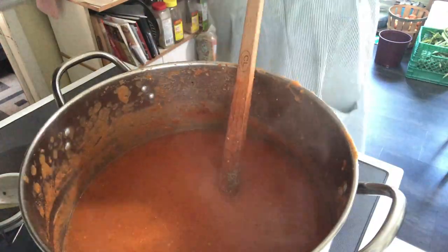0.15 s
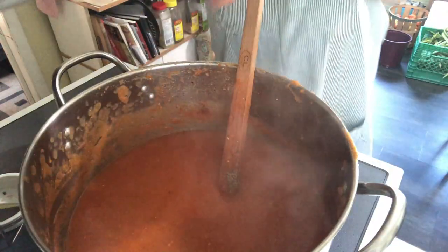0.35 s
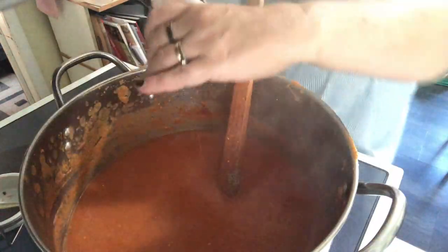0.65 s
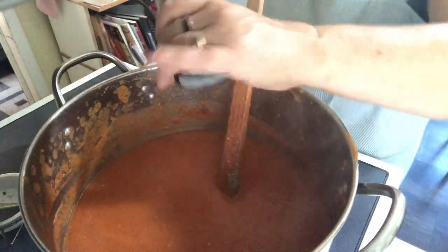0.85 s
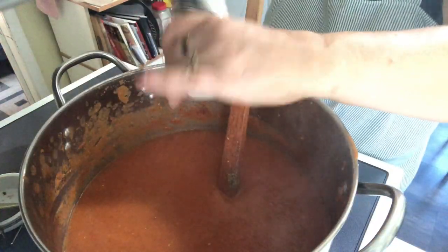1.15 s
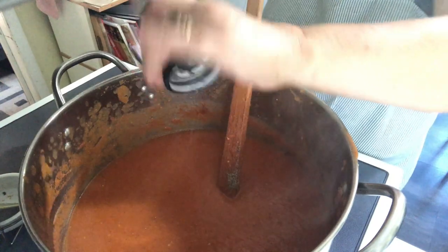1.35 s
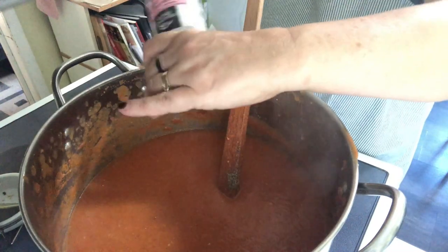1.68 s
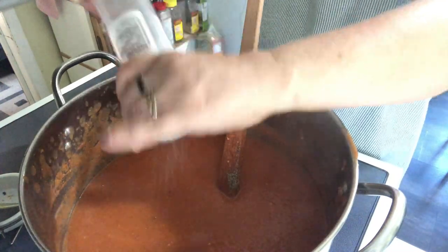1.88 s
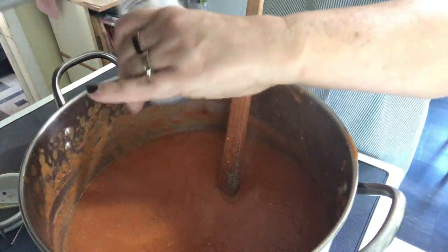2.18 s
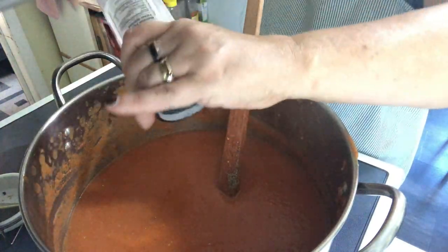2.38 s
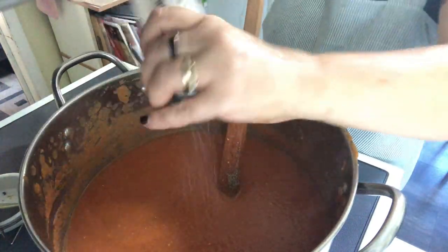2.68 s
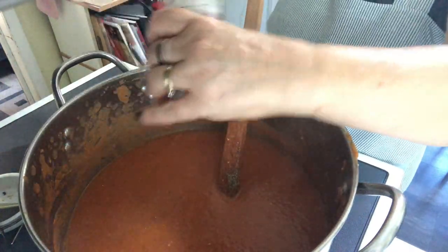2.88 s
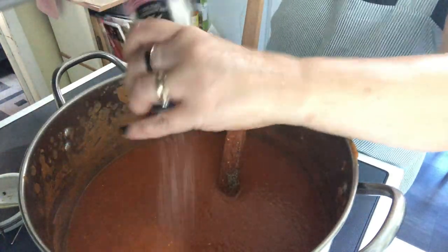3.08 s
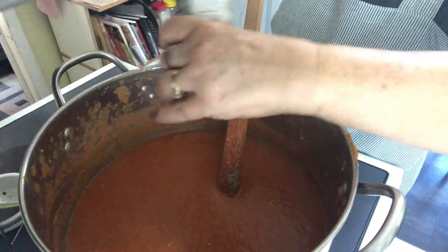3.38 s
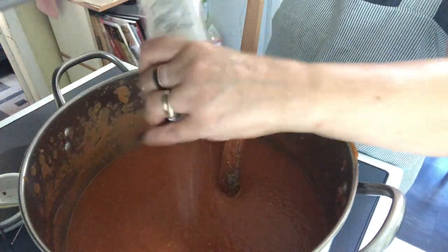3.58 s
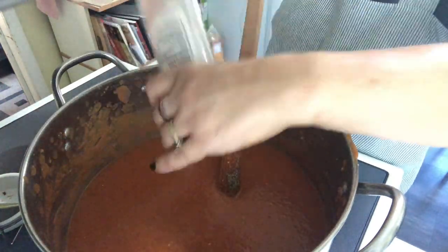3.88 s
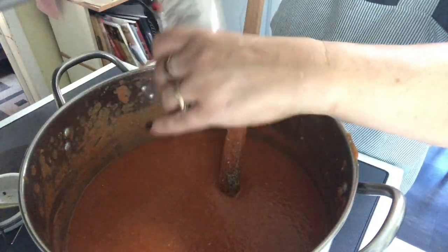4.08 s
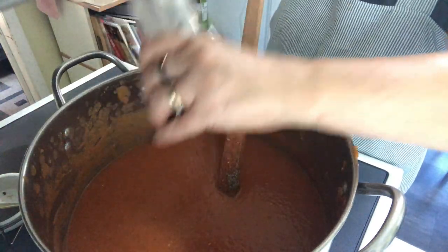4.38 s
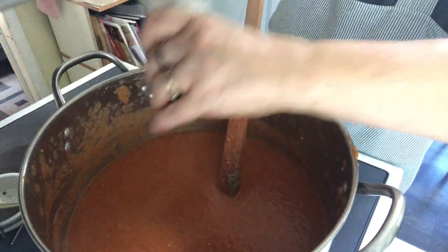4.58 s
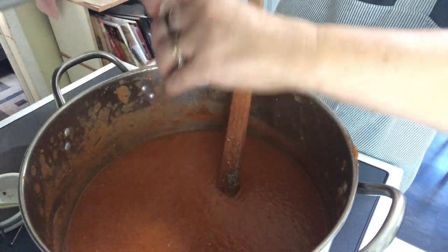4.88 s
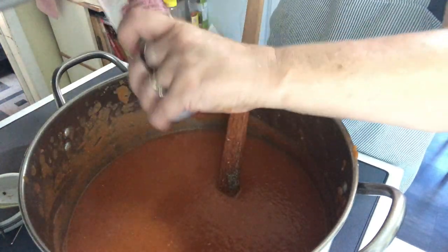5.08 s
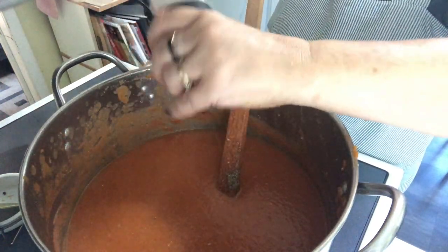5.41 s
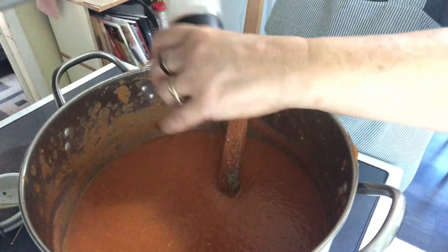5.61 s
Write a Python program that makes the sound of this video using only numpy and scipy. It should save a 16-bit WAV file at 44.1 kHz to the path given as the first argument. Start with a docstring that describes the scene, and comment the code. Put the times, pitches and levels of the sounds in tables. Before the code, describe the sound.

A close, fairly dry kitchen sound with short reflections. A very faint low rush and barely audible thick blubs run throughout. At about 0.15 s salt begins to slide in a plastic jar, a thin bright sizzle with small ticks; around 0.55 s there is a soft handling bump and the first hard jerk. Sharp, hollow plastic clacks with gritty spray come at about 0.6, 0.9, 1.25, 1.4, 1.65 and 1.85 s, each followed by a brief sandy slide. From 2 to 2.5 s it is nearly quiet, with a little trickle and a tiny plop at 2.5. Longer, crunchier shakes land near 2.6, 3.0 and 3.5 s with quiet gaps between. Around 3.9 s a strong bright swish of grains pours, then fine ticks. Knocks return at 4.35 and 4.65 s, lighter rattles from 5.0, and a tight cluster of clacks ends it near 5.5 s.

```python
"""Salt shaker over a simmering pot

A plastic shaker of salt is jerked up and down over a pot of sauce, close by in a kitchen.
Fine salt hisses along the jar (dense random grains through the jar's resonances); at each jerk
caked lumps knock on its ends and make it ring (short clusters of contacts through resonances).
A soft handling bump (swelling noise), a plop (two fading tones) and faint blubs (ringing clicks)
join in, over the low rush of the kitchen (coloured noise)."""
import sys
import numpy as np
from scipy import signal
from scipy.fft import rfft, irfft, next_fast_len
from scipy.io import wavfile
from scipy.ndimage import uniform_filter1d

SR = 44100
rng = np.random.default_rng(int(sys.argv[2]) if len(sys.argv) > 2 else 0)


def wav_out(sig):
    """Save sig, one row per channel (or a flat mono array), as 16-bit PCM at SR to the path in sys.argv[1]."""
    wavfile.write(sys.argv[1], SR, np.round(np.clip(np.atleast_2d(sig).T, -1, 1) * 32767).astype(np.int16))


N = 253512
TIME = np.arange(N) / SR  # seconds

# Levels in the tables are mixing levels: the sound functions add their own fixed trims.
# kitchen background colour: pitch_hz, level_db
KITCHEN_COLOUR = [(22, -44), (52, 4.5), (70, 2.5), (95, 0.5), (220, 3.5), (450, 0), (680, -8.5),
                  (1000, -4.5), (2200, -9), (2700, -13), (4500, -9.5), (8000, -22), (16000, -30)]
# the two rings of the sauce bubble: start_s, pitch_hz, decay_s, level_db
PLOP_RINGS = [(2.5016, 1800, 0.0022, -15.5), (2.5036, 1124, 0.0061, -15.5)]
# bump, rub of the palm, rumble: start_s, pitch_hz, width_hz, swell_s, level_db
HANDLING = [(.552, 310, 390, 0.011, -31), (.585, 200, 380, 0.029, -40), (.556, 50.0, 82, 0.036, -39.0)]
# colour of the reflections: pitch_hz, level_db
ROOM_COLOUR = [(70, -5.0), (190, 16), (400, 9), (900, 11.5), (5000, 5.5), (16000, 4)]
# resonances of the jar: pitch_hz, width_hz, level_db (against the direct sound)
JAR_MODES = [(1162, 64, -1.5), (2076, 170, -3), (2364, 153, 9), (3060, 410, -3.5), (3780, 120, -2),
             (4340, 54, -0.5), (5930, 91, -0.5), (7180, 470, -0.5), (7700, 124, 3.5), (10700, 930, -16)]
# colour of fine grains: pitch_hz, level_db
FINE_COLOUR = [(300, -53), (1200, -12), (2600, -4.5), (4000, 1.5), (7300, 0), (8600, -3), (10200, 0),
               (12500, -2), (16000, -9.5)]
# colour of coarse grains: pitch_hz, level_db
COARSE_COLOUR = [(100, -21), (600, -9.5), (950, -3), (1400, 5.5), (2200, 4), (2750, -0.5), (3400, 5),
                 (5500, -1.5), (8500, -11), (16000, -34)]
# colour of lumps: pitch_hz, level_db
LUMP_COLOUR = [(50, -60), (170, -58), (330, -24), (600, -1), (900, 8.5), (1700, -3.5), (3500, -8.5),
               (5000, -2.5), (7000, -7.5), (8600, -22), (16000, -1)]
# short hollow rings of the air in the tipped jar: peak_s, level_db
HOOTS = [(.47, -31), (.606, -22.5), (.868, -24), (1.425, -23), (1.665, -28.5)]
# the jar is tilted and salt pours along the wall:
# start_s, swell_s, hold_s, hiss_db (fine grains), rub_db (coarse grains)
POURS = [(0.1485, 0.0011, 0.093, -31.5, -31.5), (0.246, 0.047, 0.41, -31.5, -33.5),
         (0.809, .015, 0.092, -34, -30), (1.141, .005, 0.084, -40.5, -26),
         (1.259, 0.014, 0.037, -26.5, -43), (2.05, 0.035, 0.14, -50.5, -47), (2.553, .025, .005, -30, -27),
         (2.958, 0.011, .005, -43, -31), (3.035, 0.019, 0.067, -32.5, -31), (3.528, .01, 0.064, -37.5, -35),
         (3.85, .065, 0.0043, -21.5, -23), (3.94, 0.031, 0.014, -12.5, -23), (4.023, .01, .025, -29.5, -45),
         (4.101, 0.039, 0.092, -32, -35), (4.24, 0.086, 0.018, -29.5, -28.5), (4.403, .02, .2, -55, -44),
         (5.018, 0.061, 0.11, -37.5, -32.5), (5.158, 0.02, 0.014, -29.5, -32),
         (5.266, .01, .16, -40.5, -33.5), (5.49, 0.0057, 0.078, -42, -26.5)]
# jerks of the wrist; the heap lands on one end of the jar, then slides back:
# start_s, landing_s, level_db, pitch_hz (struck spot), slide_lag_s, slide_half_width_s, slide_db
SHAKES = [(0.593, 0.0049, -12.5, 1240, 0.16, 0.026, -25), (0.9611, .011, -11.5, 2650, 0.11, 0.023, -24.5),
          (1.250, 0.0058, -10.5, 1600, 0.077, 0.011, -20.5), (1.378, 0.074, -16, 3000, 0.16, 0.045, -31.5),
          (1.6577, .007, -13, 1950, 0.088, 0.029, -29.5), (1.865, .017, -13, 1270, 0.1, 0.032, -26),
          (2.573, 0.062, -14.5, 2640, 0.13, 0.043, -35), (2.996, 0.033, -13, 3020, 0.15, 0.022, -38.5),
          (3.487, 0.0174, -12.5, 2900, .16, 0.031, -34.5), (4.358, 0.0091, -14.5, 2800, 0.012, 0.016, -26),
          (4.648, 0.009, -13.5, 3480, 0.12, .036, -31.5), (5.585, 0.0063, -14.5, 2170, 0.086, 0.029, -29)]
# the flow thins at the turn of a stroke: centre_s, dip_db (a negative dip thickens it)
LULLS = [(.72, 9.5), (1.135, 1), (1.362, 2), (1.612, -0.5), (1.785, 5), (2.392, 13), (2.945, 19),
         (3.418, 17), (3.79, 21), (3.835, 6), (4.985, -5), (5.465, 4)]
# single caked lumps: start_s, landing_s, level_db, pitch_hz (struck spot), grit_db
KNOCKS = [(0.163, 0.0041, -25, 3170, -27.5), (0.445, 0.0048, -23.5, 2350, -44),
          (0.493, 0.0024, -22.5, 5950, -26), (0.563, 0.015, -24.5, 2170, -33),
          (0.836, .0092, -21, 2200, -36), (0.866, 0.0055, -11.5, 1100, -24.5),
          (0.9019, .0055, -16.5, 2370, -25), (0.916, .0026, -20, 2210, -33),
          (0.99, 0.0026, -15.5, 2370, -29), (1.15, 0.0063, -26.5, 2280, -46),
          (1.214, 0.007, -22, 2230, -42), (1.234, 0.0056, -18, 2170, -39), (1.375, 0.0088, -11, 2530, -40),
          (1.399, 0.0079, -13, 3840, -20), (1.417, 0.022, -19, 1250, -41), (1.4606, 0.0058, -13, 1890, -30),
          (1.473, 0.005, -17, 1400, -27.5), (1.628, 0.0044, -14, 2780, -44),
          (1.805, 0.011, -21.5, 1280, -27), (1.829, 0.0057, -9.5, 3320, -39),
          (1.839, 0.018, -22, 2170, -28.5), (2.101, 0.0052, -47, 5600, -39),
          (2.156, 0.0046, -39, 3200, -46), (2.419, 0.0061, -43.5, 2390, -46),
          (2.738, 0.0048, -30, 1390, -48), (2.914, 0.0051, -48, 7040, -48), (2.971, 0.01, -21, 2360, -48),
          (3.036, 0.02, -17, 2330, -26), (3.0664, 0.0041, -9.5, 2370, -36),
          (3.305, 0.0058, -43, 2400, -47.5), (3.347, 0.0049, -44, 4000, -43.5),
          (3.447, 0.047, -27, 2900, -43), (3.475, 0.0036, -17, 7150, -21), (3.5151, .011, -13, 3700, -22.5),
          (3.635, 0.0031, -42, 3660, -26.5), (3.813, 0.0049, -38, 3700, -48),
          (3.924, 0.0034, -36, 6960, -16), (4.064, .0015, -37, 7890, -24.5), (4.126, .0033, -39, 7410, -26),
          (4.161, 0.0025, -39, 4140, -23), (4.187, 0.0022, -28, 3280, -24.5),
          (4.229, 0.0012, -25, 8000, -26), (4.378, 0.0057, -26.5, 1710, -24),
          (4.67, 0.0022, -17.5, 3050, -33), (4.871, 0.0021, -28.5, 1600, -59),
          (5.042, 0.0024, -26, 4910, -46), (5.059, 0.0079, -25.5, 1080, -39),
          (5.118, 0.0024, -23.5, 5200, -30), (5.151, .0022, -27.5, 3300, -25),
          (5.253, 0.0056, -19.5, 2820, -47), (5.268, 0.0072, -21, 2550, -41),
          (5.349, 0.0013, -22, 1360, -40), (5.476, 0.002, -32, 6060, -24.5),
          (5.482, 0.0036, -16.5, 3000, -17), (5.532, 0.0095, -21, 2760, -34),
          (5.565, 0.0032, -13.5, 2100, -27), (5.578, 0.0023, -15, 1470, -17.5)]

KITCHEN_DB = -50.5
HOOT_RISE_DB_PER_S, HOOT_FALL_DB_PER_S = 400, 400
SALT_START_S = POURS[0][0]  # no salt slides before the first pour
SETTLE_DB_PER_S = 270  # a pour dies away
TRICKLE_HISS_DB, TRICKLE_RUB_DB = -59, -49  # the salt never lies quite still
LEAD_S, LEAD_DB = 0.028, -20  # loose grains arrive ahead of the heap; level against its landing
TRAIL_HISS_DB, TRAIL_RUB_DB = -21.5, -10  # stragglers follow it; levels against its landing
DRAIN_DB_PER_S = 135  # the stragglers die away
SLIDE_RUB_DB = -7  # coarse rub against the hiss of the slide back
LULL_S, LULL_THIN_S = 0.0084, 0.026  # half width in a full flow; in a trickle
GRIT_DB = -14  # grit against the landing of a heap
CRUMBS_PER_S, CRUMB_S, CRUMB_HZ = 13, 0.0019, 3630  # rough rate; landing time; middle pitch
CRUMB_GRIT_DB = 6.5  # the most grit a crumb sheds, against its own level
CRUMB_DB, CRUMB_SCATTER_DB = -30, 1  # level in a flow of -30 dB; random spread either way
CRUMB_FOLLOW = 1  # dB gained per dB of flow
TOP_HZ = 15800


def undb(db):
    """Decibels to gain."""
    return 10 ** (np.asarray(db) / 20)


def unit(x):
    """Scale to rms 1."""
    return x / np.sqrt(np.mean(x ** 2))


def add(out, s, sound):
    """Mix a sound in at time s."""
    start = int(s * SR)
    out[start:start + len(sound)] += sound[:N - start]


def ring(x, response):
    """Pass a sound through an impulse response."""
    return signal.fftconvolve(x, response)[:len(x)]


def band(x, hz, width_hz):
    """One resonance, gain 1 at its centre."""
    hz = min(hz, SR / 2.2)
    return signal.lfilter(*signal.iirpeak(hz, hz / min(width_hz, SR / 4), fs=SR), x)


def steep_band(x, hz, width_hz):
    """The same resonance twice in a row, for steeper sides."""
    return band(band(x, hz, width_hz), hz, width_hz)


def resonant_noise(hz, width_hz):
    """Noise in one steep-sided resonance, rms 1."""
    return unit(steep_band(rng.standard_normal(N), hz, width_hz))


def colour(points, size=4096):
    """Impulse response with the given (Hz, dB) spectrum that starts at once, with nothing before time 0."""
    hz, db = np.transpose(points)
    grid = np.maximum(np.arange(size // 2 + 1) * SR / size, 1)
    level_db = np.interp(np.log(grid), np.log(hz), db)
    # folding the cepstrum gives the minimum-phase response
    cepstrum = irfft(np.log(undb(level_db)))
    return irfft(np.exp(rfft(2 * cepstrum[:size // 2], size) - cepstrum[0]))


def walk(rate):
    """Smooth random wander with spread 1, taking about `rate` new values a second."""
    hold = int(SR / rate)
    steps = np.repeat(rng.standard_normal(N // hold + 1), hold)
    return unit(uniform_filter1d(steps, hold)[:N])


def grains(count, per_s, spread_db):
    """Contacts of random size at random moments, rms 1."""
    size = undb(spread_db * np.minimum(rng.exponential(size=count), 6))
    happens = rng.random(count) < per_s / SR
    return unit(size * rng.standard_normal(count) * happens + 1e-9)


def in_jar(points, modes_db=0):
    """Response of the jar to one contact of the given colour: the tick plus its ringing, with energy 1."""
    tick = colour(points)
    ringing = sum(undb(db + modes_db) * band(tick, hz, width) for hz, width, db in JAR_MODES)
    response = tick + ringing
    return response / np.linalg.norm(response)


def kitchen():
    """Low rush of the stove and the room: coloured noise that wavers very slightly."""
    rush = unit(ring(rng.standard_normal(N), colour(KITCHEN_COLOUR)))
    return undb(KITCHEN_DB + 0.2 * walk(6.4)) * rush


def simmer(db=-57):
    """Thick sauce blubs faintly: bubbles of a few sizes, each a short low ring, the lower the stronger."""
    blubs = np.zeros(N)
    for hz in (179, 224, 264, 449):
        bubbles = grains(N, per_s=16, spread_db=-0.5)
        blubs += steep_band(bubbles, hz, hz / 3) * 200 / hz
    return undb(db) * unit(blubs)


def sauce_plop():
    """A bubble bursts: a brief high ping, then its open crater rings lower."""
    out, t = np.zeros(N), TIME[:SR // 10]
    for s, hz, decay, db in PLOP_RINGS:
        envelope = np.exp(-t / decay) * (1 - np.exp(-t / 0.00044))
        add(out, s, undb(db) * np.sin(2 * np.pi * hz * t) * envelope)
    return out


def handling_bump():
    """Noise swells for a dull bump as the jar is turned over, a rub of the palm, and a low rumble."""
    out = np.zeros(N)
    for s, hz, width, swell, db in HANDLING:
        age = np.maximum(TIME - s, 0) / swell
        out += undb(db) * age * np.exp(1 - age) * resonant_noise(hz, width)
    return out


def first_sweep(ring_hz=1105, ring_width_hz=140, sizzle_hz=11900, sizzle_width_hz=2400, sizzle_db=-37):
    """A thin sheet of salt sizzles as the jar is tipped; the air inside rings hollow at the HOOTS times."""
    swell = np.zeros(N)
    for s, db in HOOTS:
        drop_db = np.maximum(HOOT_RISE_DB_PER_S * (s - TIME), HOOT_FALL_DB_PER_S * (TIME - s))
        swell += undb(db - drop_db)
    air = resonant_noise(ring_hz, ring_width_hz) * swell
    sheet = np.exp(-((TIME - .36) / 0.31) ** 2) * (TIME > SALT_START_S)
    return air + undb(sizzle_db) * sheet * resonant_noise(sizzle_hz, sizzle_width_hz)


def lulls(flow_db):
    """Salt is weightless at a turn, so the flow thins; a trickle takes longer to recover than a stream."""
    width = np.interp(flow_db, [-52, -38], [LULL_THIN_S, LULL_S])
    return flow_db - sum(dip * np.exp(-((TIME - s) / width) ** 2) for s, dip in LULLS)


def salt_flow():
    """Levels in dB of fine hiss and coarse rub: shakes and pours add their power to a faint trickle."""
    hiss, rub = [undb(TRICKLE_HISS_DB)], [undb(TRICKLE_RUB_DB)]
    for s, length, db, _, lag, width, slide_db in SHAKES:
        age = TIME - s
        lead = undb(db + LEAD_DB) * np.clip(1 + age / LEAD_S, 0, 1) * (age < 0)
        trail = undb(db - DRAIN_DB_PER_S * np.maximum(age - length, 0)) * (age >= 0)
        slide = undb(slide_db) / np.cosh(np.clip((age - lag) / width, -20, 20))
        hiss += [lead, undb(TRAIL_HISS_DB) * trail, slide]
        rub += [lead, undb(TRAIL_RUB_DB) * trail, undb(SLIDE_RUB_DB) * slide]
    for s, swell, hold, hiss_db, rub_db in POURS:
        age = TIME - s
        settle = undb(-SETTLE_DB_PER_S * np.maximum(age - swell - hold, 0))
        pour = np.clip(age / swell, 0, 1) * settle
        hiss.append(undb(hiss_db) * pour)
        rub.append(undb(rub_db) * pour)
    return [lulls(10 * np.log10(sum(part ** 2 for part in parts))) for parts in (hiss, rub)]


def sliding_salt(hiss_db, rub_db, ripple_db=1.15, surge_db=1.22):
    """Salt pours along the wall in tiny avalanches; stray crystals stand out when the flow is thin."""
    avalanche = undb(ripple_db * walk(110) + surge_db * walk(35)) * (TIME > SALT_START_S)
    # each crystal bounces for a millisecond or two
    bounces = ring(np.abs(grains(N, per_s=60, spread_db=.5)), np.exp(-TIME[:SR // 50] / .0009))
    # the crystals' level changes less than the flow's
    crystals = undb(.42 * hiss_db - 25) * unit(bounces * rng.standard_normal(N))
    fine = undb(hiss_db + 3.5) * grains(N, per_s=24000, spread_db=2.5)
    coarse = undb(rub_db - 3.13) * grains(N, per_s=4500, spread_db=2.5)
    # the salt lying against the wall damps its ringing
    fine_ring, coarse_ring = in_jar(FINE_COLOUR, modes_db=-5), in_jar(COARSE_COLOUR, modes_db=-4)
    hiss = ring(avalanche * (fine + crystals), fine_ring)
    rub = ring(avalanche * (coarse + .5 * crystals), coarse_ring)
    return hiss + rub


def shifting(x, depth_db=3, rate=18):
    """The moving heap covers and frees parts of the wall, so each resonance swells and fades by itself."""
    out = x.copy()
    for hz, width, _ in JAR_MODES:
        gain = undb(depth_db * walk(rate) - 1.5)
        out += (gain - 1) * band(x, hz, 2.5 * width)
    return out


def crumbs(flow_db):
    """Small lumps tumble at random, louder in a strong flow; rows have the columns of KNOCKS."""
    rows = []
    for when, size, pitch, grit in rng.random((int(CRUMBS_PER_S * TIME[-1]), 4)):
        s = SALT_START_S + when * (TIME[-1] - SALT_START_S)
        flow_gain_db = CRUMB_FOLLOW * (flow_db[int(s * SR)] + 30)
        db = CRUMB_DB + flow_gain_db + CRUMB_SCATTER_DB * (2 * size - 1)
        hz = CRUMB_HZ * 2 ** (2 * pitch - 1)  # up to an octave either way
        rows.append((s, CRUMB_S, db, hz, db + CRUMB_GRIT_DB - 10 * grit))
    return rows


def late_lows(x, lag_s=0.001275, knee_hz=160):
    """Low notes arrive later than high ones, so each knock trails downward; lag_s is the delay at 840 Hz."""
    size = next_fast_len(len(x) + SR // 4)
    hz = np.arange(size // 2 + 1) * SR / size
    cycles = lag_s * 1000 * np.log1p(hz / knee_hz)
    return irfft(rfft(x, size) * np.exp(-2j * np.pi * cycles), size)[:len(x)]


def knocks(flow_db, wall_hz=2900, spot_width_hz=330, spot_db=-3, thud_hz=470, thud_width_hz=760,
           thud_db=-20.0, thud_db_per_octave=3, spread_hz_per_s=22000, clump_db=3.0):
    """Heaps, lumps and crumbs land as clusters of contacts with gritty spray; each struck spot has a pitch."""
    out, lump_ring, grit_ring = np.zeros(N), in_jar(LUMP_COLOUR), in_jar(FINE_COLOUR)
    t = TIME[:SR // 8]
    heaps = [(s, length, db, hz, db + GRIT_DB) for s, length, db, hz, *_ in SHAKES]
    clumps = undb(clump_db * walk(260))  # a long landing comes in clumps
    for s, length, db, hz, grit_db in heaps + KNOCKS + crumbs(flow_db):
        # the contacts go on while the lump collapses, then die out
        fade = np.exp(-.5 * t / length - np.maximum(t - length + .001, 0) / .0016)
        push = np.minimum(t / .0004, 1) * fade
        push = push * np.take(clumps, int(s * SR) + np.arange(len(t)), mode="wrap")
        contacts = push * grains(len(t), per_s=16000, spread_db=2.5)
        centre = np.sqrt(hz * wall_hz)  # a stiffer spot makes the whole wall sound brighter
        wall = band(ring(contacts, lump_ring), centre, centre)
        spot = band(contacts, hz, spot_width_hz + spread_hz_per_s * length)  # long landings hit many spots
        thud = steep_band(contacts, thud_hz, thud_width_hz)  # the whole jar recoils
        recoil_db = thud_db + thud_db_per_octave * np.log2(wall_hz / hz)  # a softer spot gives way more
        body = unit(wall) + undb(spot_db) * unit(spot) + undb(recoil_db) * unit(thud)
        grit = ring(push * grains(len(t), per_s=14000, spread_db=1.2), grit_ring)
        share = np.sqrt(length / t[-1])  # the levels hold for the time of the landing
        add(out, s, share * (unit(body) * undb(db + 1.28) + unit(grit) * undb(grit_db + 6.0)))
    return late_lows(out)


def room(x, t60=0.2, wet_db=-18):
    """Short reflections from the pot, counter and walls, strongest in the low middle; t60 in seconds."""
    t = TIME[:SR // 2]
    tail = rng.standard_normal(len(t)) * np.exp(-np.log(1000) * t / t60) * (t > .003)
    tail = ring(tail / np.linalg.norm(tail), colour(ROOM_COLOUR))
    return x + undb(wet_db) * ring(x, tail)  # wet_db counts on top of the tail's colour


def scene():
    """The shaker and the pot in the kitchen."""
    hiss_db, rub_db = salt_flow()
    salt = shifting(sliding_salt(hiss_db, rub_db))
    shaker = salt + first_sweep() + knocks(hiss_db) + handling_bump()
    return (room(shaker + sauce_plop()) + simmer() + kitchen())[None]


def record(dry):
    """The microphone drops the deepest bass, rounds the loudest peaks and cuts the top."""
    dry = signal.sosfilt(signal.butter(4, 38, "high", fs=SR, output="sos"), dry)
    rounded = dry / (1 + dry ** 6) ** (1 / 6)
    return signal.sosfilt(signal.ellip(10, .2, 70, TOP_HZ, fs=SR, output="sos"), rounded)


dry = scene()
out = record(dry)
wav_out(out)
```